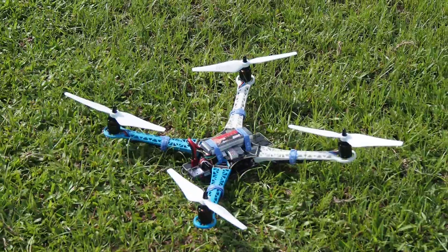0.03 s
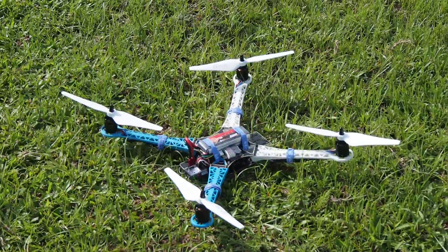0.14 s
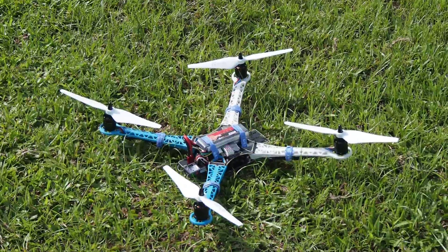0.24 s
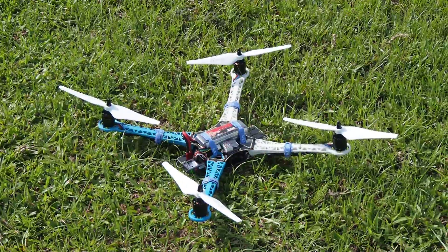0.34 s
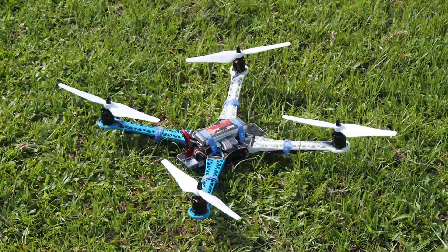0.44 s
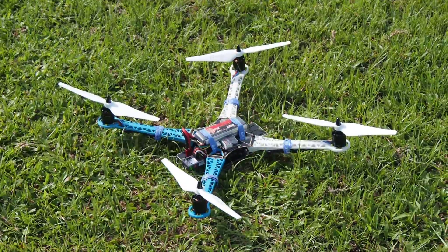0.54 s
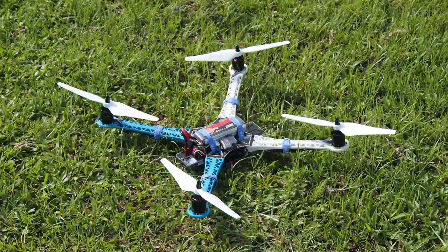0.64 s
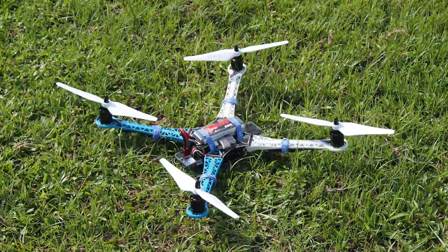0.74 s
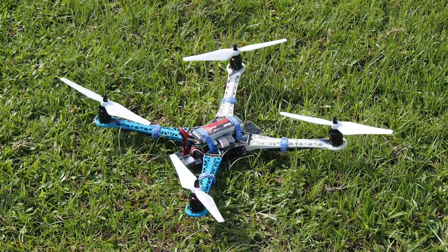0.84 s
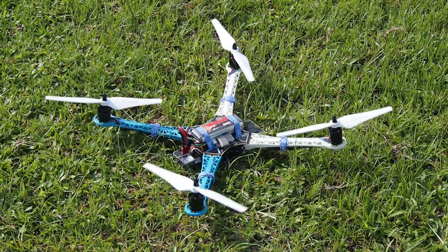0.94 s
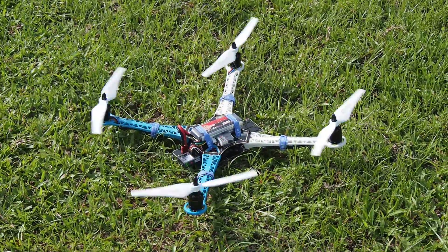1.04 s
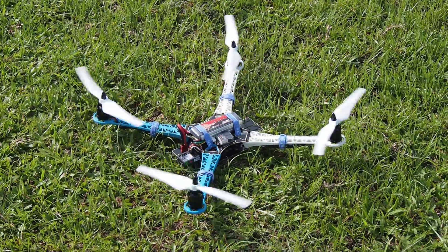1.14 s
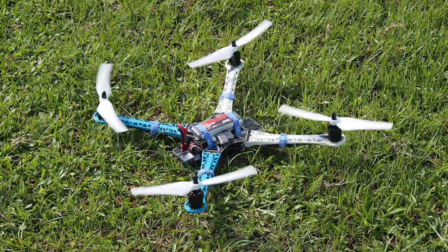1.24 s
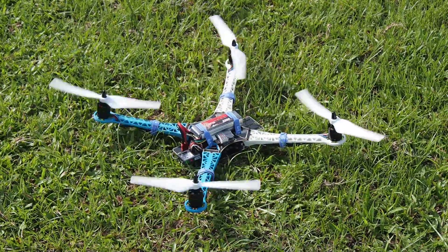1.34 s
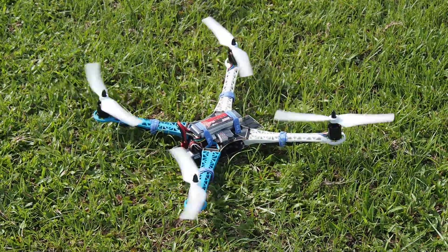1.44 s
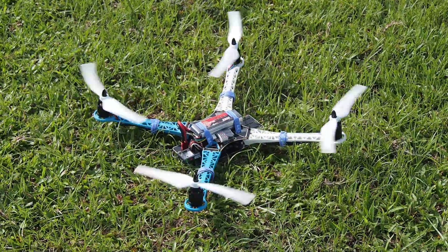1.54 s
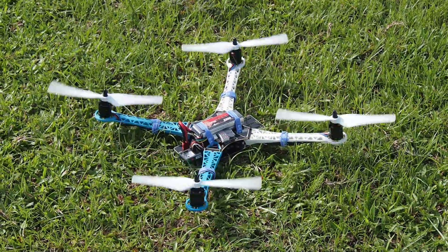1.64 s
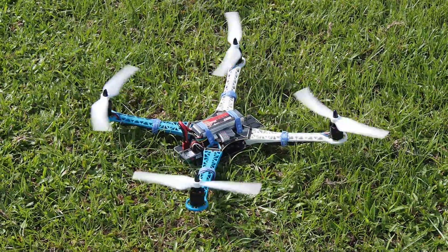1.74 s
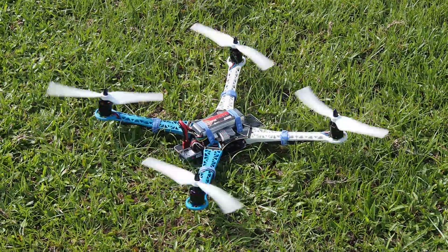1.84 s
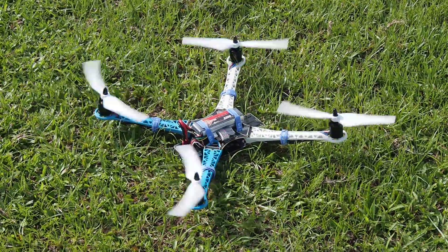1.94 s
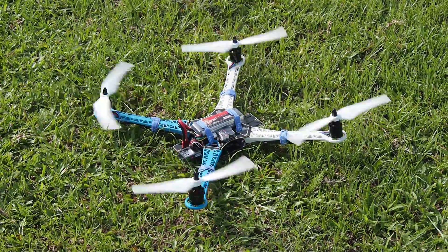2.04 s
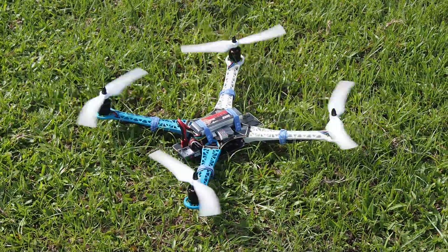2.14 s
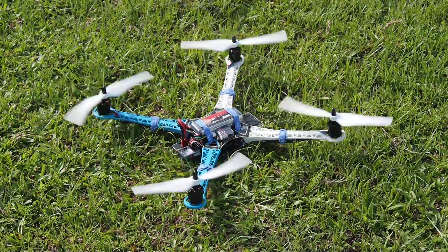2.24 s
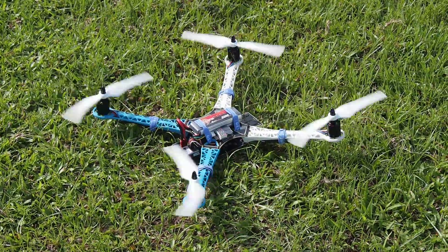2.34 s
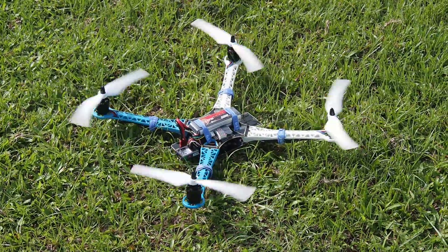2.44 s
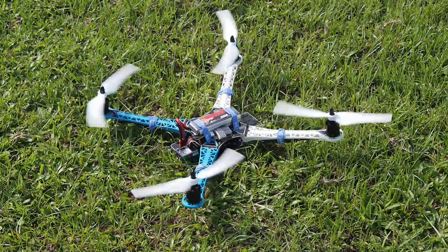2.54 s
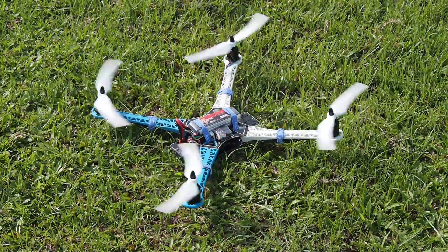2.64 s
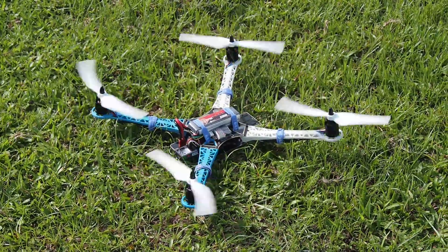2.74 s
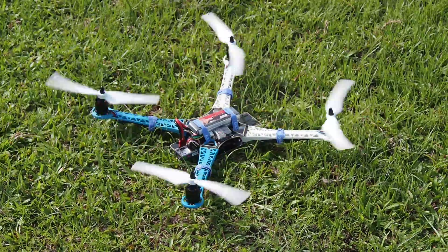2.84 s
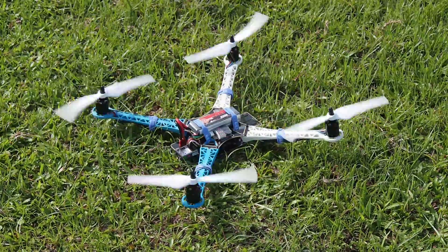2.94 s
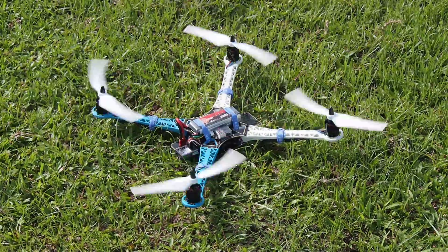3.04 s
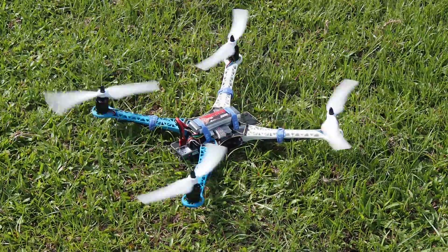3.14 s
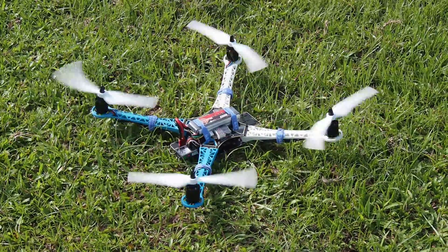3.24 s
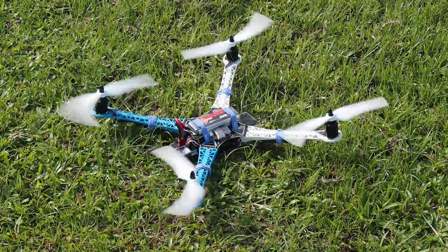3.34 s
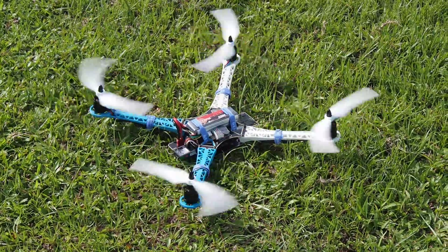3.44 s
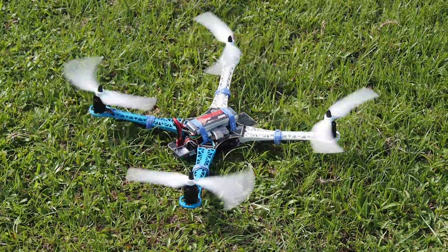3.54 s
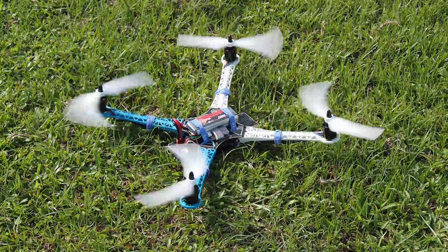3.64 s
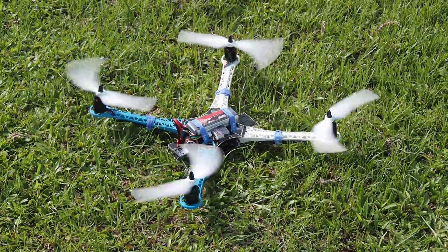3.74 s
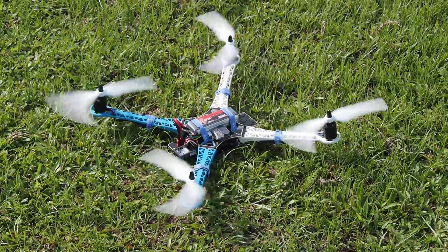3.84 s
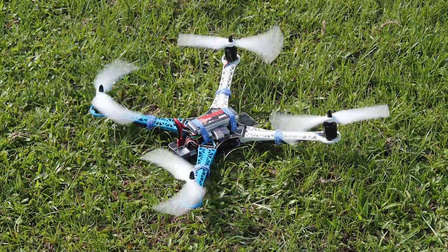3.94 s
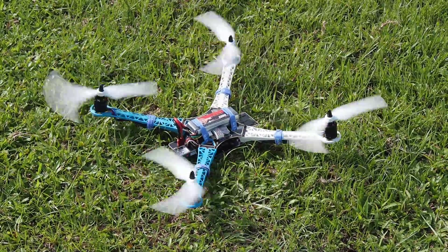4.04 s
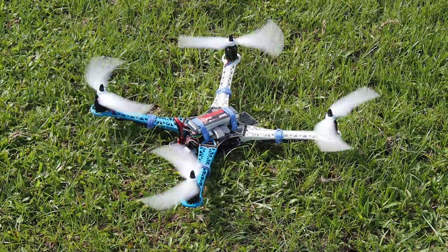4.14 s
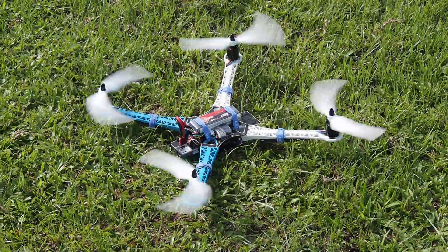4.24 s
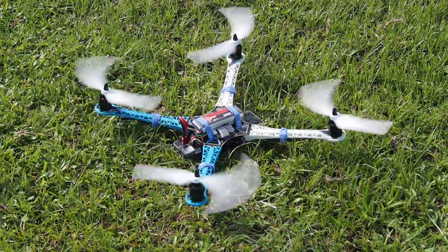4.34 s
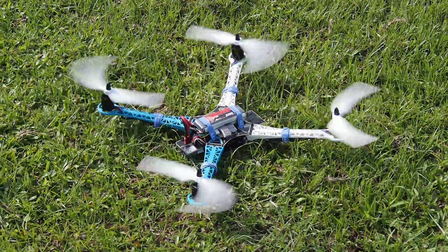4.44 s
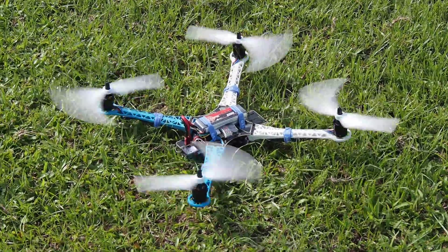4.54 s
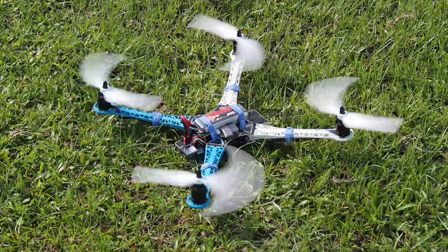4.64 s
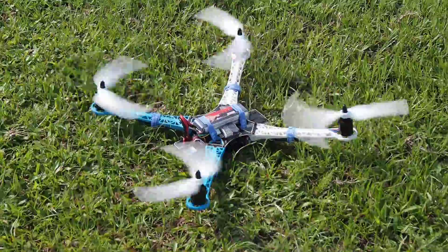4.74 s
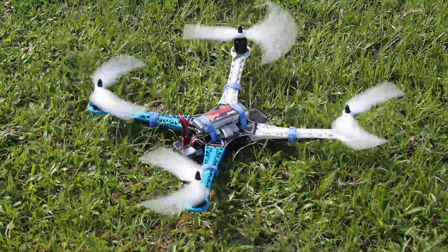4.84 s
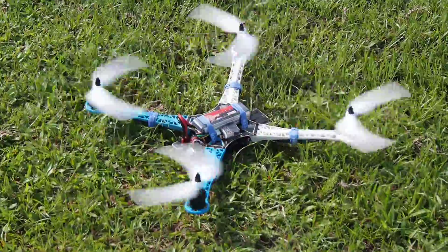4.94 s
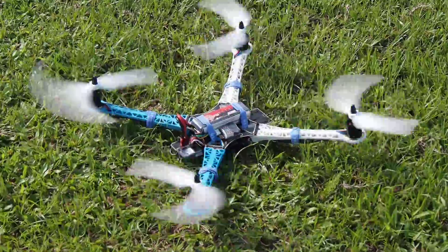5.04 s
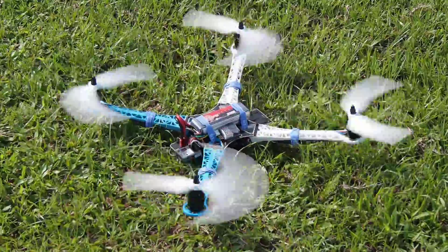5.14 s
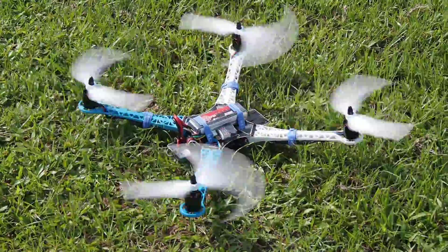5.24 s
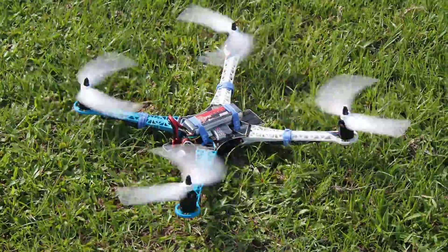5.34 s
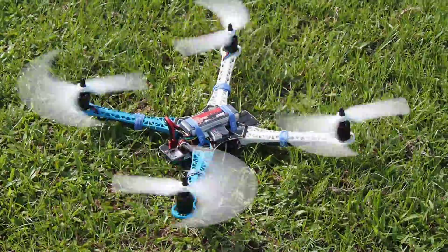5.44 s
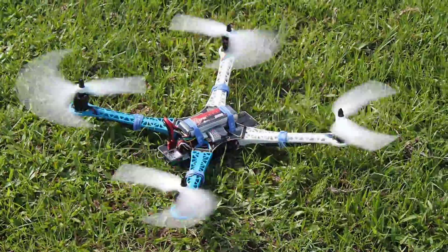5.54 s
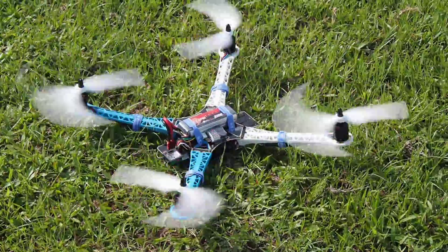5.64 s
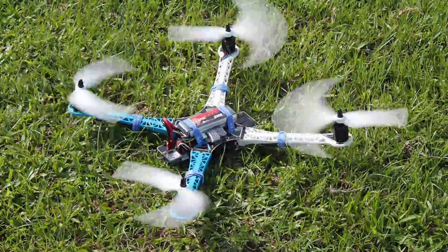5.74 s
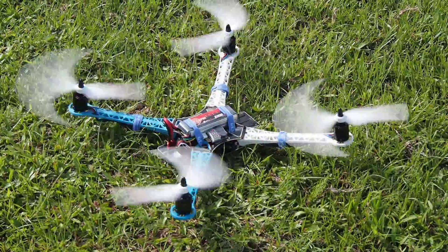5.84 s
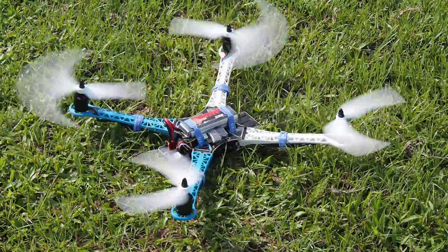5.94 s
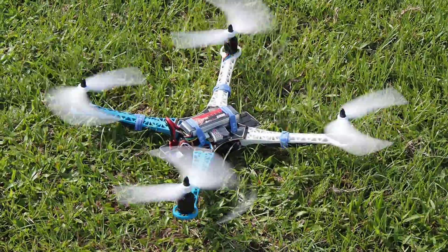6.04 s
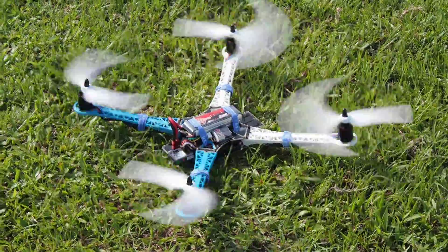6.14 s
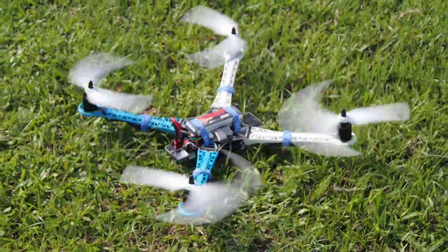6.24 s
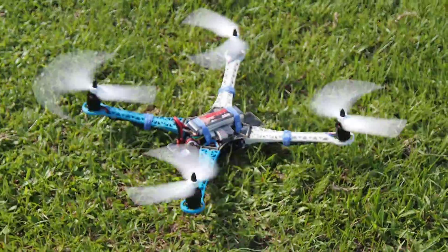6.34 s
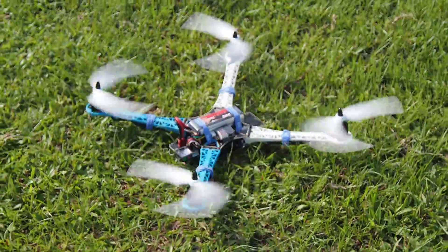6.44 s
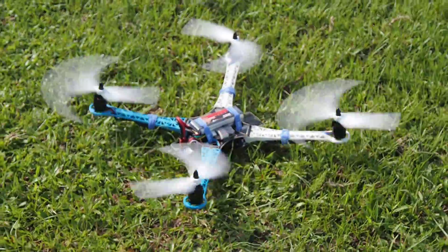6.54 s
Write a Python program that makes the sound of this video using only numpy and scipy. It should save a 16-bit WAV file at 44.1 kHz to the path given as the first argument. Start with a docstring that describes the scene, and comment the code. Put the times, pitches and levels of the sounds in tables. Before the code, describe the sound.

A small quadcopter starts with a thin whistle, idles with propeller tips flicking grass, then throttles up in steps to a loud, buzzing roar.

```python
"""A soft thump on the camera, and an insect buzzes over a lawn and a far-off rumble. Just before one second
a quadcopter's four brushless motors start with the whistle of their speed controllers, then idle while
a propeller tip flicks the grass. From three seconds they are throttled up in steps, with brief squeals,
until the air breaks up on the blades and they roar. The close camera's gain control holds the roar level."""
import sys
import numpy as np
from scipy.fft import rfft, irfft, next_fast_len
from scipy.io import wavfile
from scipy.ndimage import uniform_filter1d, minimum_filter1d, map_coordinates

SR = 44100
rng = np.random.default_rng(int(sys.argv[2]) if len(sys.argv) > 2 else 0)


def wav_record(signal):
    """Record a signal, one row per channel, as 16-bit PCM in the file named by sys.argv[1]."""
    frames = np.transpose(np.atleast_2d(signal))
    bounded = np.clip(frames, -1, 1)
    # unit amplitude maps onto the largest positive 16-bit level
    quanta = np.round(bounded * 32767).astype(np.int16)
    wavfile.write(sys.argv[1], SR, quanta)


N = 290883
TIME = np.arange(N) / SR
CRUISE = 60  # reference rotor speed, turns a second


# The colour of the wake's roar, the tips' hiss and the finest eddies' fizz.
# Each row: frequency in Hz, level in dB.
WAKE_SPECTRUM = [(100, -46), (280, -14), (450, -14), (620, -6.5), (1250, -4), (1700, -7.5), (2250, -14.5),
                 (4000, -27), (9000, -68)]
TIP_SPECTRUM = [(1200, -21), (2250, -17.5), (2500, -2), (3300, 1), (3700, -3), (4400, -4), (4800, -1),
                (5700, 1), (7400, -3.5), (8300, 0.5), (9250, -2.5), (9600, -12.5), (11500, -48),
                (15000, -71)]
FIZZ_SPECTRUM = [(7000, -7.5), (10500, 0), (13000, -15.5), (15000, -37), (16000, -51)]

def blade_rush(spin, wake_db, tips_db, fizz_db, swish):
    """Wake roar and tip hiss grow steeply with speed and swell as each blade comes round."""
    speed = np.mean([speed for speed, _ in spin], axis=0)
    pace = speed / CRUISE
    passes = np.sqrt(np.mean([np.exp(swish * np.cos(2 * angle)) for _, angle in spin], axis=0))
    wake = amp(wake_db) * pace ** 2.38 * turbulence(speed, smooth_db=-1) * bite() * noise(WAKE_SPECTRUM)
    tips = amp(tips_db) * pace ** 2.6 * turbulence(speed, smooth_db=-11) * noise(TIP_SPECTRUM)
    fizz = amp(fizz_db) * np.tanh(pace ** 8 / 4) * noise(FIZZ_SPECTRUM)  # needs the most speed
    return unit(passes) * (wake + tips + fizz)


# The contour that the blade harmonics slide along. Each row: frequency in Hz, level in dB.
HUM_SPECTRUM = [(60, -26), (130, -17), (175, -8), (230, -8), (280, -4.5), (340, -7.5), (400, -5.5),
                (480, -9), (600, -2), (720, 1), (900, -2), (1060, -1), (1250, -1.5), (1600, -9),
                (2400, -20)]

def blade_hum(spin, hum_db, throb_db, steady, harmonics=11):
    """Two blades a rotor chop through eddies: blade-rate harmonics, partly steady, partly flickering."""
    hum, lift = np.zeros(N), bite()
    for (speed, angle), (_, _, _, _, rotor_db, *_) in zip(spin, MOTORS):
        pace = speed / CRUISE
        breakup = turbulence(speed, smooth_db=-41)
        throb = amp(throb_db + rotor_db) * np.tanh(pace ** 6)
        buzz = amp(hum_db + rotor_db) * pace ** 3.06 * lift
        for k in range(1, harmonics + 1):
            flicker = steady + (1 - steady) * wobble(30)
            partial = np.sin(2 * k * angle + 2 * np.pi * rng.random())
            strength = throb if k < 4 else buzz  # big eddies feed the lowest harmonics
            hum += amp(along(HUM_SPECTRUM, 2 * k * speed)) * strength * breakup * flicker * partial
    return hum


def turbulence(speed, smooth_db, breakup_speed=32.5, spread=6):
    """Gain of the air noise: smooth_db while the flow clings to the blades, full once it breaks up."""
    return amp(smooth_db * (1 - np.tanh((speed - breakup_speed) / spread)) / 2)


def bite(boost_db=3, lift_speed=86, spread=2.5):
    """Extra gain as the blades bite harder near lift-off."""
    return amp(boost_db * (1 + np.tanh((spool()[0] - lift_speed) / spread)) / 2)


# The throttle opens in steps. Each row: time in seconds, turns a second of the fastest rotor.
THROTTLE = [(.75, 0), (.85, 7), (1, 13.5), (1.25, 19), (1.55, 22), (2, 24.6), (2.95, 26.7), (3.25, 45),
            (3.4, 51.5), (3.65, 56.5), (4.05, 58.3), (4.22, 65.5), (4.55, 74), (5, 81.5), (5.78, 83.5),
            (6.12, 91.5), (6.6, 89.5)]

def spool(late=0, inertia_s=0.1):
    """Speed and speed gained per second of a rotor that trails the throttle, smoothed by its inertia."""
    demand = np.interp(TIME - late, *np.transpose(THROTTLE))
    speed = uniform_filter1d(demand, int(inertia_s * SR))
    return abs(speed) * (demand > 0), np.maximum(np.gradient(speed) * SR, 0)


def rotors():
    """Speed and shaft angle of each rotor; each hunts a little around its throttle."""
    speeds = [share * spool(late)[0] * (1 + 0.006 * wobble(6)) for share, late, *_ in MOTORS]
    return [(speed, 2 * np.pi * (np.cumsum(speed) / SR + rng.random())) for speed in speeds]


# The four motors. Each row: share of the fastest one's speed, lag in seconds, switching pitch in Hz,
# then the trims in dB of whistle, blade hum, upper sideband and lower sideband.
MOTORS = [(1, 0, 8011, -3, -1, -6.5, -11), (.965, .06, 8015, -8, 0, -20, -22),
          (.91, .15, 7955, -10, -4, -14, -20), (.85, .17, 8012, -13, -9, -20, -7)]

def whistle(spin, whistle_db, flutter_db):
    """The controllers' switching tone; 14 passing magnets put a sideband on either side of it."""
    tone = np.zeros(N)
    for (speed, angle), (_, late, hz, db, _, upper_db, lower_db) in zip(spin, MOTORS):
        magnets = 14 * angle
        carrier = 2 * np.pi * (hz * TIME + rng.random()) + .65 * speed / CRUISE * wobble(45)
        sides = amp(upper_db) * np.sin(carrier + magnets) + amp(lower_db) * np.sin(carrier - magnets)
        centre = amp(db + flutter_db * wobble(25)) * np.sin(carrier)
        tone += current(late) * (centre + sides)
    return amp(whistle_db) * tone


# The resonances of frame arm and motor casing. Each row: pitch in Hz, width in Hz, weight in dB.
CASING_MODES = [(1150, 230, 0), (4650, 135, .3), (4900, 170, -2), (7100, 140, -8), (8100, 1050, 0)]
# The bearings' hiss. Each row: frequency in Hz, level in dB.
BEARING_SPECTRUM = [(700, -12), (1500, 3), (3800, 4.5), (9000, 0.5), (12000, -38), (16000, -49)]

def casing(spin, casing_db, cogging_db, ring_db, grind_db, bearings_db, stalled):
    """Cogging, 84 times a turn, and rough commutation ring the casings and arms; the bearings hiss."""
    def resonance(hz):
        modes = sum((-1) ** k * amp(db) * 1j * hz * width / (pitch ** 2 - hz ** 2 + 1j * hz * width)
                    for k, (pitch, width, db) in enumerate(CASING_MODES))
        return modes * abs(modes)  # steepens the peaks

    cogging = sum(np.sin(84 * angle) for _, angle in spin)
    shake = amp(ring_db) * cogging + amp(grind_db) * rng.standard_normal(N)
    ring = filtered(shake * amp(2 * wobble(22.5)), resonance)
    hiss = amp(bearings_db) * noise(BEARING_SPECTRUM)
    drive = current() * (stalled + (1 - stalled) * np.tanh(spin[0][0] / 12))
    return amp(casing_db) * drive * (amp(cogging_db) * cogging + ring + hiss)


def current(late=0, load_db=10, surge_db=3.5):
    """A motor's current as a gain: off until armed, growing with speed, surging while it accelerates."""
    speed, acceleration = spool(late)
    draw = (speed > 0) * amp((load_db * speed + surge_db * acceleration) / CRUISE)
    return uniform_filter1d(draw, SR // 50)


# The shrill band of the loaded windings. Each row: frequency in Hz, level in dB.
WINDING_SPECTRUM = [(7000, -120), (7650, -25), (7870, -7), (7960, 0), (8060, -5), (8250, -25), (9000, -120)]

def windings(shrill_db, flutter_db):
    """Once the rotors are loaded, ragged switching makes the windings ring in a narrow, grainy band."""
    load = uniform_filter1d(turbulence(spool(late=.1)[0], smooth_db=-24), SR // 4)
    return amp(shrill_db + flutter_db * wobble(14)) * load * noise(WINDING_SPECTRUM)


# The squeals. Each row: peak time in seconds, pitch in Hz, glide in Hz per second, level in dB,
# half length in seconds.
SQUEALS = [(1.43, 4680, 0, -42, .04), (1.73, 1550, 500, -50, .04), (1.845, 2720, 2500, -46, .022),
           (2.025, 3200, -2000, -50, .02), (2.11, 2950, 2000, -51, .02), (2.197, 2740, 0, -44, .012),
           (3.22, 4650, 0, -40.5, .05), (3.25, 7980, 0, -32, .08), (3.34, 4630, -500, -36, .025),
           (3.68, 4760, 0, -35, .035), (4.05, 4750, 0, -34, .05), (4.07, 4910, -1700, -32.5, .05),
           (4.16, 4760, 0, -31.5, .025), (4.5, 4730, 0, -31, .04), (4.52, 4880, -1100, -30, .06),
           (4.59, 4600, 0, -28.5, .035), (4.735, 4615, 0, -28, .045), (4.89, 4605, 300, -30, .035),
           (6.08, 4900, 1300, -29, .06), (6.18, 5050, 0, -29.5, .025)]

def squeals(roughness):
    """Blades and motors squeal briefly: rough tones, some gliding, that swell and fade."""
    out = np.zeros(N)
    for peak_s, hz, glide, db, half_s in SQUEALS:
        t = TIME - peak_s
        phase = 2 * np.pi * (hz * t + glide * t ** 2 / 2) + roughness * wobble(110)
        out += np.sqrt(2) * amp(db) * np.exp(-(t / half_s) ** 2) * np.sin(phase)
    return out


# A blade tip hits grass. Each row: start in seconds, scrape level in dB, scrape tilt in dB per octave,
# low knock in dB, high ring in dB, scrape's 60 dB decay in seconds.
GRASS_HITS = [(1.179, -20.5, 1.5, -32.5, -37, 0.021), (1.252, -19.5, 3, -41, -34, 0.017),
              (1.3195, -24.5, 1, -56, -37, 0.02), (1.4111, -16.5, -0.5, -36, -32.5, 0.013),
              (1.498, -14.0, 1.0, -28, -28.5, 0.019), (1.5566, -23, 1, -50, -46, 0.015),
              (1.6259, -27, 2, -54, -45, 0.012), (1.639, -26.5, -0.5, -54, -41, 0.012),
              (1.7165, -24.0, 0, -56, -55, 0.012), (1.7601, -29, 2, -56, -48, 0.02),
              (1.804, -24.5, 3, -52, -50, 0.012), (1.845, -25.5, 3, -52, -38, 0.024),
              (1.933, -14.0, 0.5, -42, -36, 0.014), (2.0046, -15, 1, -39, -45, 0.015),
              (2.0732, -14, 5, -44, -31, 0.014), (2.165, -13.0, 1.5, -34, -30, 0.015),
              (2.2318, -12.5, -1, -28.5, -27, 0.017), (2.2477, -25, -1.5, -50, -47, 0.012),
              (2.302, -12.5, -1.5, -32, -38, 0.014), (2.3712, -27, 8, -49, -50, 0.016),
              (2.463, -21.5, 0, -50, -43, 0.015), (2.529, -22.0, 0.0, -40, -36, 0.017),
              (2.598, -16.0, 0.5, -39, -51, 0.012), (2.6643, -17.0, 2, -38, -38, 0.015),
              (2.729, -30, 5, -46, -58, 0.012), (2.816, -18, 5.0, -42, -40, 0.014),
              (2.903, -14, -1.5, -45, -33.5, 0.014), (2.967, -13.5, 1, -46, -33.5, 0.013),
              (3.0345, -27, 1.0, -47, -45, 0.015), (3.118, -23, -0.5, -52, -46, 0.012),
              (3.181, -3, -1.5, -46, -50, 0.0032), (3.2191, -16.5, -1, -39, -38, 0.012),
              (3.2703, -16, -3, -38, -38, 0.0089), (3.331, -14.5, -3, -44, -46, 0.012),
              (3.401, -20, -2, -42, -40, 0.012), (5.2832, -3.5, 3, -38, -38, 0.012)]
# The scrape's colour before its tilt. Each row: frequency in Hz, level in dB.
SCRAPE_SPECTRUM = [(300, -18), (1200, -14), (3300, -4.5), (4400, -8), (6000, -6), (8600, 3.5),
                   (10200, -9.5), (10850, -4), (12400, -19), (14000, -17), (16000, -32)]
# The struck blade's modes. Each row: pitch in Hz, level in dB, 60 dB decay in seconds.
BLADE_MODES = [(1099, -1, 0.096), (1174, -5, .08), (1350, -3.5, 0.072), (2330, -10, 0.1), (2542, 0, 0.073),
               (4350, -8.5, 0.096), (4930, 1, 0.033)]

def grass_flicks(ring_db, attack_s):
    """A stalk scrapes over the blade for a few milliseconds and leaves it knocking and ringing."""
    out, t = np.zeros((2, N + SR)), np.arange(SR // 8) / SR
    attack = 1 - np.exp(-t / attack_s)
    for start, scrape_db, tilt, low_db, high_db, scrape_t60 in GRASS_HITS:
        colour = [(hz, db + tilt * np.log2(hz / 8000)) for hz, db in SCRAPE_SPECTRUM]
        scrape = noise(colour, size=len(t)) * amp(scrape_db - 60 * t / scrape_t60)
        detune = 1 + 0.008 * rng.standard_normal()  # the ring shifts with the point of contact
        ring = np.zeros(len(t))
        for hz, db, t60 in BLADE_MODES:
            strike_db = (low_db if hz < 2000 else high_db) + db + rng.normal(0, 1)
            ring += amp(strike_db - 60 * t / t60) * np.sin(2 * np.pi * hz * detune * t)
        onset = round(start * SR)
        out[:, onset:onset + len(t)] += attack * (scrape + amp(ring_db) * ring)
    return out[:, :N]


def bump(bump_db, hz, t60):
    """A soft low thump on the camera body, right at the start."""
    envelope = amp(bump_db - 60 * TIME / t60) * (1 - np.exp(-TIME / 0.025))
    return envelope * (np.sin(2 * np.pi * hz * TIME) + 0.46 * np.sin(2 * np.pi * 205 * TIME))


# The insect falters and picks up again. Each row: time in seconds, level in dB.
INSECT_EFFORT = [(0, 3.5), (.2, 5.5), (.7, 5.5), (.85, 2.5), (1.1, 0), (1.35, 1.5), (1.7, 6), (2.4, 4.5),
                 (2.7, 6.5), (3.1, 5.5)]
# Its rasp's colour and its wing tones. Each row: frequency in Hz, level in dB.
RASP_SPECTRUM = [(5100, -38), (5190, -11), (5420, -9), (5480, -2), (5780, -3), (5890, -12), (6030, -4),
                 (6300, 1.5), (6600, -3), (6760, -8), (7100, 0), (7400, -2), (7620, -12), (8400, -18),
                 (9600, -42)]
WING_TONES = [(5480, -1), (5566, -4), (5949, -9), (6029, -7), (6212, -2), (6288, 0), (6530, -6), (6660, -6),
              (7058, -3), (7235, -4), (7337, -4)]

def insect(rasp_db, wings_db, stroke_hz, left_db):
    """An insect stridulates: a rasp and wavering wing tones, pulsed by its fast strokes."""
    strokes = 2 * np.pi * np.cumsum(stroke_hz * (1 + 0.004 * wobble(6.4))) / SR
    pulsing = 1 + .35 * np.cos(strokes)
    effort = amp(np.interp(TIME, *np.transpose(INSECT_EFFORT)))
    rasp = amp(rasp_db) * noise(RASP_SPECTRUM)
    wings = amp(wings_db) * wavering(WING_TONES, drift=0.92, rate=27)
    return balance(left_db) * effort * pulsing * (rasp + wings)


# The outdoor rumble's colour and a far-off machine's tones. Each row: frequency in Hz, level in dB.
RUMBLE_SPECTRUM = [(22, -47), (40, -6), (72, -2.5), (95, -2), (200, -4.5), (400, -12.5), (1100, -19.5),
                   (2000, -26.5), (4000, -33.5), (9000, -36), (15000, -61)]
MACHINE_TONES = [(36.8, -53.5), (71, -52), (218, -56.5), (2440, -68.5)]

def distance(rumble_db):
    """A bed of outdoor rumble with a far-off machine's hum and thin whine."""
    return amp(rumble_db) * noise(RUMBLE_SPECTRUM) + wavering(MACHINE_TONES, drift=0.53, rate=6)


# The stereo width of every noise. Each row: frequency in Hz, left-right likeness from 0 to 1.
STEREO_LIKENESS = [(100, .9), (400, .99), (1200, .997), (2800, .98), (5500, .91), (9000, .65), (13000, .35)]

def noise(spectrum, size=N):
    """Stereo noise of rms 1, wider in the treble."""
    def mid_and_side(hz):
        width = np.arccos(np.clip(along(STEREO_LIKENESS, hz), -1, 1)) / 2
        return amp(along(spectrum, hz)) * [np.cos(width), np.sin(width)]

    mid, side = filtered(rng.standard_normal((2, size)), mid_and_side)
    return unit(np.array([mid + side, mid - side]))


def wavering(tones, drift, rate):
    """(Hz, dB) tones whose phase wanders by about drift radians."""
    return np.sqrt(2) * sum(amp(db) * np.sin(2 * np.pi * hz * TIME + drift * wobble(rate))
                            for hz, db in tones)


def wobble(rate):
    """A smooth random curve, rate knots a second."""
    knots = rng.standard_normal(int(N * rate / SR) + 4)
    coarse = np.arange(0, N, 32)
    return np.interp(np.arange(N), coarse, map_coordinates(knots, [coarse * rate / SR]))


def filtered(x, response):
    """x through an equaliser whose gain is response(Hz)."""
    size = next_fast_len(x.shape[-1] + SR // 10)
    return irfft(rfft(x, size) * response(np.fft.rfftfreq(size, 1 / SR)), size)[..., :x.shape[-1]]


def along(points, hz):
    """A curve through (Hz, value) points on a log axis, read at hz."""
    freqs, values = np.transpose(points)
    return np.interp(np.log(hz + 1), np.log(freqs + 1), values)


def balance(left_db):
    """Channel gains that put the left left_db above the right."""
    return amp(left_db * np.array([[.5], [-.5]]))


def amp(db):
    """Decibels to gain."""
    return 10 ** (np.asarray(db) / 20)


def unit(x):
    """Scaled to rms 1."""
    return x / np.sqrt(np.mean(x ** 2) + 1e-20)


# The pan of the whole mix. Each row: frequency in Hz, left minus right in dB.
MIX_PAN = [(100, -3), (400, -4), (1200, -4.5), (3000, -6), (6000, -7), (9500, -6.5), (14000, -3)]

def scene():
    """The quadcopter on its lawn; everything sits a little to the right."""
    spin = rotors()
    hum = blade_hum(spin, hum_db=-39, throb_db=-28.5, steady=.52)
    rush = blade_rush(spin, wake_db=-28.5, tips_db=-25, fizz_db=-31.5, swish=0.33)
    controllers = whistle(spin, whistle_db=-43.5, flutter_db=3)
    casings = casing(spin, casing_db=-48, cogging_db=-17, ring_db=-27, grind_db=13.5,
                     bearings_db=-8, stalled=0.27)
    motors = controllers + casings + windings(shrill_db=-35, flutter_db=2)
    grass = grass_flicks(ring_db=0.5, attack_s=0.00064)
    buzz = insect(rasp_db=-46.5, wings_db=-59.5, stroke_hz=375, left_db=1)
    background = buzz + distance(rumble_db=-43) + bump(bump_db=-17, hz=133, t60=0.14)
    mix = hum + rush + motors + squeals(roughness=1) + grass + background
    return filtered(mix, lambda hz: balance(along(MIX_PAN, hz)))


def gain_control(x, ceiling_db, hold_s, firmness):
    """The gain drops just after the level passes the ceiling, holds, and comes back."""
    lag, window = SR // 80, 2 * int(hold_s * SR / 2) + 1
    level = np.sqrt(abs(uniform_filter1d(np.mean(x ** 2, axis=0), lag)) + 1e-12)
    ducking = np.minimum(1, amp(ceiling_db) / level) ** firmness
    held = minimum_filter1d(ducking, window, origin=window // 2)
    return x * np.pad(uniform_filter1d(held, lag), (lag, 0), mode="edge")[:N]


def record(dry):
    """Gain control, a soft overload near full scale, then a top cut at 16 kHz."""
    levelled = gain_control(dry, ceiling_db=-18.5, hold_s=0.077, firmness=0.92)
    rounded = levelled / (1 + abs(levelled / .95) ** 8) ** (1 / 8)
    return filtered(rounded, lambda hz: hz < 16000)


dry = scene()
out = record(dry)
wav_record(out)
```